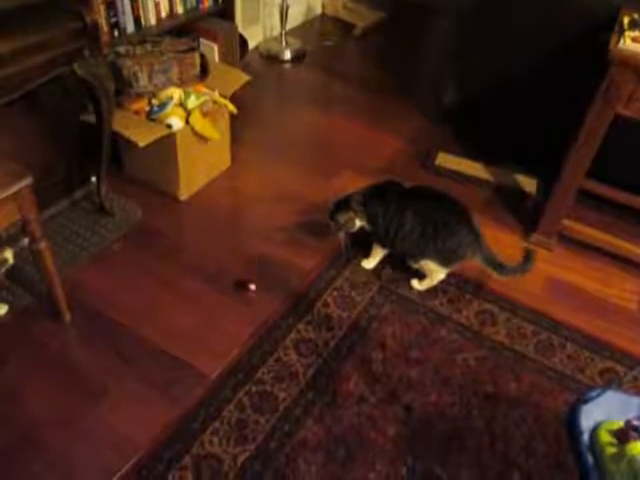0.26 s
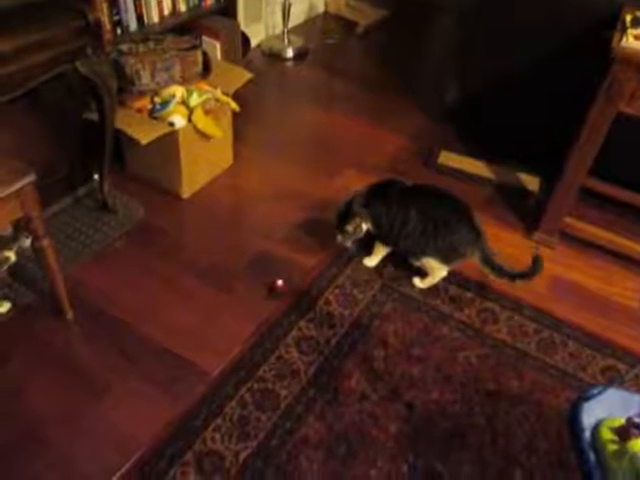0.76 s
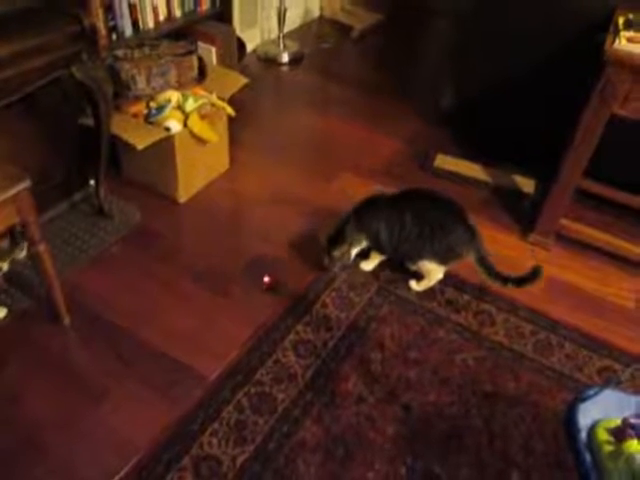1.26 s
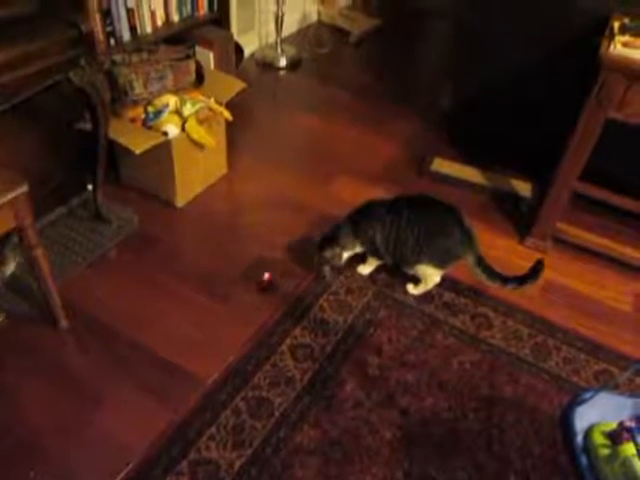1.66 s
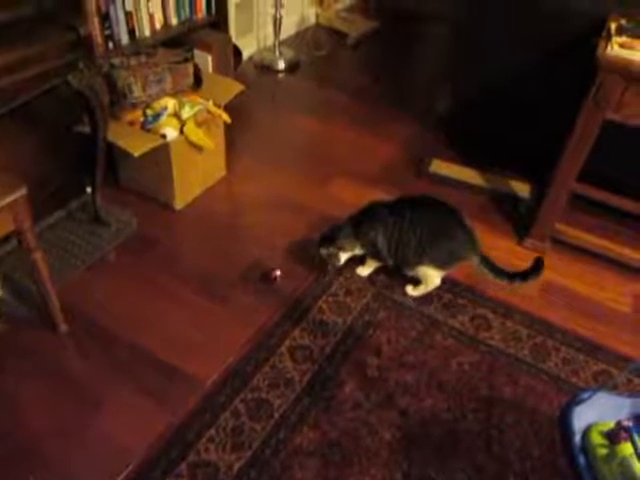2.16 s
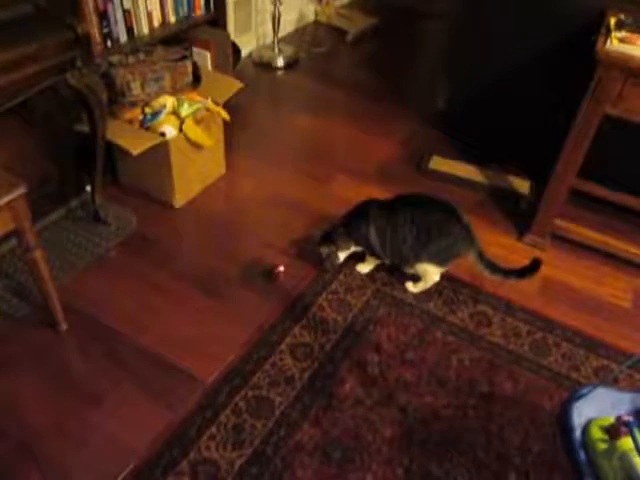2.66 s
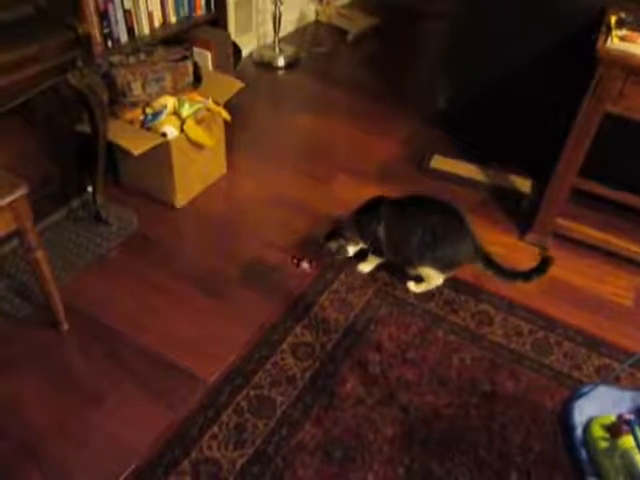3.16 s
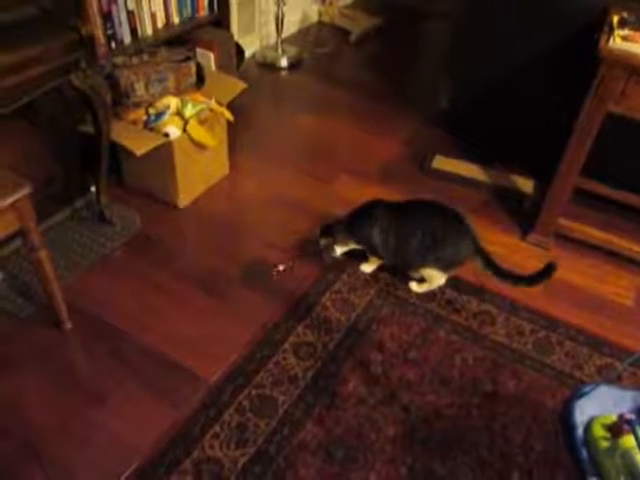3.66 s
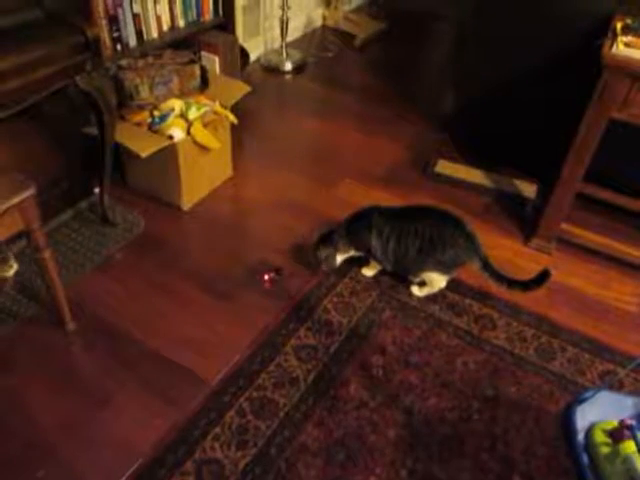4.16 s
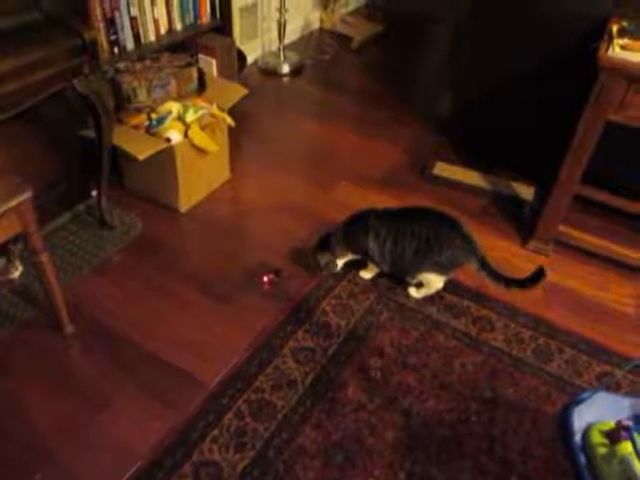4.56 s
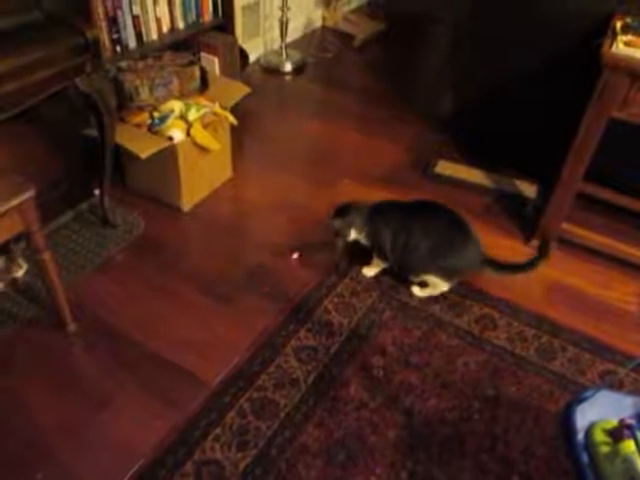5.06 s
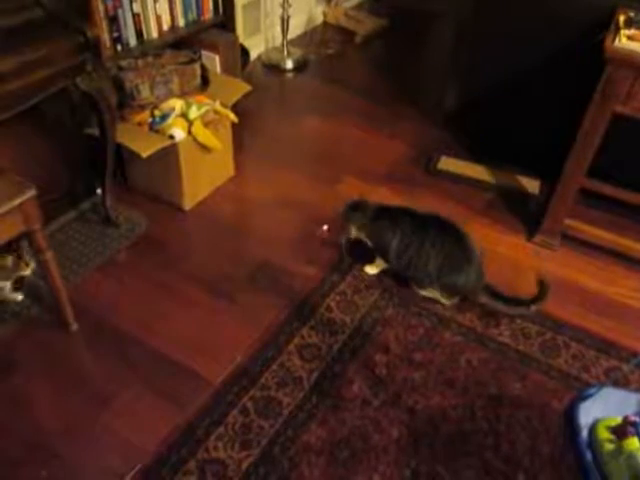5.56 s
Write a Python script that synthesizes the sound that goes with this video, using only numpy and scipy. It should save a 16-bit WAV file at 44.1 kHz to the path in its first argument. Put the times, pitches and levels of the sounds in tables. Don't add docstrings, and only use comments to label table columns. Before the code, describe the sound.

In a quiet furnished room, a tiny motorised toy rattles over floorboards a few steps from a small camera microphone. It runs, stops, runs again with limping gears, pauses for clicks, then makes two more whirring runs over soft hiss.

```python
import sys
import numpy as np
from scipy import signal
from scipy.fft import rfft, irfft
from scipy.io import wavfile
from scipy.ndimage import uniform_filter1d

SR = 44100
rng = np.random.default_rng(int(sys.argv[2]) if len(sys.argv) > 2 else 0)


def generate_wav(sig):
    pcm = np.round(np.clip(np.atleast_2d(sig).T, -1, 1) * 32767).astype(np.int16)
    wavfile.write(sys.argv[1], SR, pcm)


def decibels_to_gain(level_db):
    exponent = np.asarray(level_db, float) / 20
    return 10 ** exponent


N = 256200

# time in seconds, level in dB.
RUN_EFFORT = [
    [(0, -27.5), (.09, -31.5), (.25, -28), (.66, -32.5), (.98, -30), (1.056, -31), (1.13, -42.5),
     (1.22, -54)],
    [(1.452, -45), (1.47, -37), (1.552, -30), (1.62, -33), (1.94, -30.5), (2.0, -39.5), (2.034, -43),
     (2.1, -57)],
    [(2.58, -79), (2.62, -40.5), (2.65, -28.5), (2.93, -31.5), (3.5, -29), (3.89, -29), (3.956, -41),
     (4.06, -52.5)],
    [(4.5, -70), (4.52, -59), (4.538, -32), (4.6, -26.5), (4.76, -28.5), (5.54, -27), (5.65, -30.5),
     (5.81, -28)],
]
# time in seconds, pitch in Hz, level in dB.
MOTOR_WHINE = [
    [(0, 788, -43), (0.184, 789, -44), (0.424, 795, -48.5), (0.44, 789, -68)],
    [(0.45, 819, -41), (0.578, 820.4, -34.5), (0.744, 813.3, -38.5), (1.05, 819, -37.5),
     (1.1, 820.5, -53.5)],
    [(2.63, 795, -47.5), (2.96, 787.5, -48), (3.08, 783.5, -44.5), (3.194, 803, -43.5),
     (3.716, 794.4, -44.5), (3.956, 786, -52), (3.98, 830, -57)],
    [(4.57, 834, -42), (4.62, 831, -43), (4.7, 835, -45.5), (4.9, 823, -48.5), (5.04, 823, -41),
     (5.11, 824.5, -47), (5.438, 824, -42.5), (5.81, 822, -48.5)],
]
# time in seconds, pitch in Hz, level in dB.
TWIN_WHINE = [
    [(0.46, 868.7, -56), (0.692, 845.7, -48), (1.08, 865, -53)],
    [(4.53, 730, -56), (4.572, 731, -46), (4.668, 741, -48), (4.984, 734.7, -49), (5.5, 730, -49.5),
     (5.81, 730, -52)],
]
# frequency in Hz, level in dB per Hz.
SHELL_COLOUR = [(880, -37), (1500, -11.5), (1620, -12), (1720, -14), (2090, -14.5), (2350, -2),
                (2960, -1.5), (3200, -1), (3770, -2.5), (4230, -7), (4900, -8), (6040, -19.5),
                (8430, -30.5), (9540, -57), (12400, -66), (21000, -120)]
# frequency in Hz, width in Hz, level in dB.
SHELL_MODES = [(2420, 130, -3), (2890, 80, -5), (3260, 100, -2), (3830, 110, 0), (4430, 90, -6)]
# frequency in Hz, level in dB per Hz.
SCRAPE_COLOUR = [(450, -11), (600, -0.5), (950, 6.5), (1250, 6), (1600, -4.5), (2000, 6), (2400, -21.5)]
# frequency in Hz, width in Hz, level in dB.
BOARD_MODES = [(200, 60, -14), (350, 62, 0), (410, 70, -7), (496, 40, -11)]
# time in seconds, peak in dB, ring in Hz.
HARD_KNOCKS = [(0.052, -13.5, 3580), (0.1054, -26, 3050), (0.206, -10.5, 3470), (0.2898, -15, 2520),
               (0.3584, -14, 3810), (0.4129, -21, 2390), (0.4725, -13, 2540), (0.6598, -14.5, 2670),
               (0.71, -10, 2507), (0.7821, -19.5, 2500), (0.8323, -10.5, 2415), (1.0725, -14, 2667),
               (2.6498, -9, 3320), (2.721, -9.5, 3170), (2.8087, -10.5, 3630), (2.879, -11, 3800),
               (2.969, -16, 3670), (3.035, -10.5, 3460), (3.1495, -11, 2920), (3.2644, -9, 3023),
               (3.3413, -15, 2740), (3.5138, -9, 2324), (3.6475, -13.5, 2710), (4.6135, -21.5, 2902),
               (4.657, -21.5, 3330), (4.7408, -37, 3380), (5.1729, -11.5, 3100), (5.2354, -10.5, 3090),
               (5.2934, -20.5, 3227), (5.4856, -10, 2320)]
# time in seconds, blow in dB, rumble in dB.
BUMPS = [(0.21, -31, -44), (.488, -41, -55), (.584, -50, -39.5), (.978, -54, -40), (1.522, -6, -44),
         (1.554, -50, -42), (1.976, -53, -35), (2.695, -28, -33), (2.88, -37, -47), (3.186, -25, -35.5),
         (3.239, 0, -54), (3.496, -15, -55), (3.576, -9, -56), (3.755, -15, -62), (3.945, -41, -31),
         (3.979, -45, -36.5), (4.635, -43, -36), (4.8, -14, -31), (5.24, -34.5, -36), (5.272, -30, -34),
         (5.543, -41, -50), (5.736, -39, -33.5)]
# time in seconds, peak in dB, upper ring in Hz, lower rings in dB,
# bright rings in dB.
CLICKS = [
    (1.1375, -23.5, 2960, 3.5, -24),
    (1.3025, -23, 3720, -2, 14.5),
    (1.4117, -22, 3430, 3.5, -18),
    (1.996, -31, 3390, 9, -11),
    (2.0261, -25.5, 3540, -1.5, -15),
    (2.363, -20.5, 3920, -5.5, 11),
    (2.5456, -33.5, 3666, 5.5, -4),
    (2.556, -30, 3700, -9, -6),
]
# frequency in Hz, time to fall 60 dB in seconds.
LOWER_RINGS = [(1350, 0.0041), (2100, 0.0051), (2800, 0.0061)]
# frequency in Hz, level in dB per Hz.
HISS_COLOUR = [(12, -18.5), (20, -8), (27, -10.5), (89, -8.5), (189, -9), (285, -6.5), (558, -10.5),
               (704, -15.5), (761, -8.5), (822, -12), (1740, -14), (5410, -23.5), (5840, -26.5),
               (9540, -56), (12400, -92.5), (21000, -120)]
# frequency in Hz, rms level in dB.
HUM = [(775, -70), (1712, -74), (5706, -73), (6293, -77)]
# frequency in Hz, time to fall 60 dB in seconds.
ROOM_DECAY = [(300, 0.26), (1000, 0.38), (3000, 0.35), (6000, 0.18), (9000, 0.31)]
# time in seconds, peak in dB, pitch in Hz.
CREAKS = [(2.533, -38.5, 870), (2.549, -39, 1380), (2.562, -36, 1130), (2.576, -45, 1150),
          (2.59, -39, 1310), (2.602, -41, 1460)]
# frequency in Hz, time to fall 60 dB in seconds.
EDGE_RINGS = [(700, 0.013), (4450, 0.004), (5800, 0.0036), (7800, 0.0024)]
# start in seconds, once-a-turn beat in dB, then lone strikes,
# drumming and scrape in dB against effort.
GAITS = [
    (0, 4, -20.5, -17, -17.5),
    (1.3, 6, -17, -14, -17.5),
    (2.3, 2, -22, -16.5, -16.5),
    (4.3, 0, -23, -19.5, -18.5),
    (5.3, -4, -22.5, -22, -20.5),
]
# start in seconds, 2nd overtone in dB, 3rd overtone in dB,
# roughness from 0 to 1.
LOADS = [(0, -14, -10, .15), (.445, -19, -3, .05), (2, -14, -3, .45), (3.15, -12, -1, .35),
         (4.3, -12, -7, .4), (4.9, -4, -7, .22), (5.64, -14, -7, .25)]
# start of a round in seconds, level in dB.
LIMPS = [(1.467, -34), (1.5417, -17), (1.6199, -18), (1.6967, -17), (1.7739, -21), (1.8489, -21.5),
         (1.931, -23)]
# delay in seconds, level in dB, ring in Hz, treble in dB, low in dB.
LIMP_FIGURE = [
    (0, 3, 3260, -29, -9.5),
    (0.0317, -4, 3700, -29, -12.5),
    (0.052, -29.5, 2750, -19, -19),
]
CASE_DB = [4.5, 4.5, -0.5, 4.5, -15, -12, -21, -24]
# time in seconds, peak in dB, ring in Hz.
MORE_KNOCKS = [(0.6, -15.5, 3550), (0.7536, -22.5, 2620), (0.876, -22.5, 2450), (0.9512, -15, 3300),
               (1.6304, -16.5, 3720), (1.8354, -31, 2830), (2.6285, -26, 2550), (3.17, -18.5, 3003),
               (4.5338, -31, 2740), (2.9518, -14, 2970), (3.7662, -29, 3020), (3.8058, -20.5, 3320),
               (3.8725, -14, 2930), (3.9469, -20.5, 3620), (4.2353, -36, 3400), (4.3291, -34.5, 3588),
               (5.0372, -12.5, 2203), (5.0633, -29, 2600)]
# start in seconds, level in dB.
FLANK = [
    (0, -30),
    (4.3, -5),
]

TURN_S, TURN_HZ = 1.619, 39.1
THIN_FROM_HZ, THIN_DB, THIN_DB_PER_KHZ = 8200, -110, 9


def evened(x):
    return x / np.sqrt(np.mean(x ** 2) + 1e-20)


def read(points, hz):
    f, value = np.transpose(points)
    return np.interp(np.log(hz + 1), np.log(f + 1), value)


def played(tables, index, rest):
    t, out = np.arange(N) / SR, np.full(N, float(rest))
    for rows in tables:
        rows = np.array(rows)
        on = (t >= rows[0, 0]) & (t <= rows[-1, 0] + .02)
        out[on] = np.interp(t[on], rows[:, 0], rows[:, index])
    return out


def level(tables, index):
    return uniform_filter1d(decibels_to_gain(played(tables, index, -120)), size=200)


def stepped(rows, index):
    rows = np.array(rows)
    return rows[np.searchsorted(rows[1:, 0], np.arange(N) / SR), index]


def coloured(x, points):
    hz = abs(np.fft.fftfreq(8192, 1 / SR))
    log_gain = np.log(decibels_to_gain(np.maximum(read(points, hz), -100)))
    taps = np.fft.ifft(np.exp(np.conj(signal.hilbert(log_gain)))).real[:2048]
    return signal.oaconvolve(x, taps / np.linalg.norm(taps))[:N]


def ring(x, hz, width):
    r = np.exp(-np.pi * width / SR)
    return 2 * signal.lfilter([1 - r], [1, -r * np.exp(2j * np.pi * hz / SR)], x).real


def ticks(per_s, spread_db):
    when, size, sign = rng.random(N), rng.exponential(1, N), rng.choice([-1., 1.], N)
    return evened((when < per_s / SR) * sign * decibels_to_gain(spread_db * np.minimum(size, 3.2)))


def drift(hz):
    slowness = 1 + (np.fft.rfftfreq(N, 1 / SR) / hz) ** 2
    return evened(irfft(rfft(rng.standard_normal(N)) / slowness, N))


def train(events):
    out = np.zeros(N)
    for s, db in events:
        out[min(round(s * SR), N - 1)] = decibels_to_gain(db)
    return out


def add(mix, s, sound):
    part = mix[round(s * SR):][:len(sound)]
    part += sound[:len(part)]


def wheel_turn():
    return (np.arange(N) / SR - TURN_S) * TURN_HZ % 1


def gears():
    spot = rng.integers(0, len(SHELL_MODES), N)
    effort = level(RUN_EFFORT, 1)
    beat = .5 - wheel_turn()
    throb = decibels_to_gain(1.52 * drift(45) + 0.21 * drift(260) + stepped(GAITS, index=1) * beat)
    chatter = effort * evened(shell(ticks(1700, spread_db=-1.5) * throb, spot))
    chatter += decibels_to_gain(stepped(FLANK, index=1)) * ring(chatter, 2200, 200)
    sparks = ring(ring(ticks(92, spread_db=3.5) * throb, 5600, 1700), 5600, 1700)
    chatter += decibels_to_gain(stepped(GAITS, index=2)) * effort * evened(sparks)
    return decibels_to_gain(-2.5) * chatter + decibels_to_gain(-20.0) * gear_knocks(spot)


def gear_knocks(spot):
    t = np.arange(N) / SR
    s, db, hz, treble_db, low_db = knock_rows()
    dying, rattle = decibels_to_gain(-60 * t[:2500] / 0.098), ticks(2500, spread_db=2.5)

    def burst(burst_db):
        blows = train(zip(s, burst_db))
        return rattle * signal.oaconvolve(blows, dying)[:N] + 3.0 * blows

    knocks = shell(burst(db), spot)
    knocks += decibels_to_gain(-15) * ring(ring(burst(db + treble_db), 6000, 2400), 6000, 2400)
    knocks += decibels_to_gain(21) * ring(ring(burst(db + low_db), 1000, 700), 1000, 700)
    for at, peak_db, f in zip(s, db, hz):
        fading = decibels_to_gain(peak_db + 8 - 60 * t[:900] / .025)
        add(knocks, at, fading * np.sin(2 * np.pi * f * t[:900]))
    return knocks


def knock_rows():
    straight = [(s, db, hz, -15, -20.5) for s, db, hz in HARD_KNOCKS + MORE_KNOCKS]
    limping = []
    for s, db in LIMPS:
        for late, step_db, *colour in LIMP_FIGURE:
            limping.append((s + late, db + step_db, *colour))
    return np.transpose(straight + limping)


def shell(x, spot):
    modes = 0
    for k, (hz, width, db) in enumerate(SHELL_MODES):
        modes = modes + decibels_to_gain(db + 3 * drift(5)) * ring(x * (spot == k), hz, width)
    return coloured(x + decibels_to_gain(6.5) * modes, SHELL_COLOUR)


def boards(x):
    return sum(decibels_to_gain(db) * ring(ring(x, hz, width), hz, 1.62 * width) for hz, width, db in BOARD_MODES)


def wheels():
    effort = level(RUN_EFFORT, 1)
    grit = ticks(1200, spread_db=0.5) * decibels_to_gain(3.2 * drift(40) - 10.5 * wheel_turn())
    scuffs = ticks(900, spread_db=1.5) * decibels_to_gain(2.0 * drift(40) - 4 * wheel_turn())
    scrape = coloured(scuffs, SCRAPE_COLOUR)
    s, blow_db, rumble_db = np.transpose(BUMPS)
    swell = np.bartlett(round(0.038 * SR))
    rumble = signal.oaconvolve(train(zip(s, rumble_db)), swell, "same")
    rolling = decibels_to_gain(stepped(GAITS, index=3)) * effort + rumble
    dragging = decibels_to_gain(stepped(GAITS, index=4)) * effort
    drumming = decibels_to_gain(-3.5) * rolling * evened(boards(grit))
    blows = decibels_to_gain(21.0) * boards(train(zip(s, blow_db)))
    return drumming + blows + dragging * evened(scrape)


def motor(tables, rough, overtones_db):
    turn = 2 * np.pi * np.cumsum(played(tables, 1, 800) + 1.5 * drift(8)) / SR
    out = np.zeros(N)
    for k, db in enumerate(overtones_db, 1):
        scatter = drift(29) * np.sin(k * turn) + drift(24) * np.cos(k * turn)
        fuzz = np.clip(rough + 0.087 * (k - 1), 0, 1)
        steady = np.sqrt(2 - 2 * fuzz) * np.sin(k * turn + k)
        out += decibels_to_gain(db) * (steady + np.sqrt(fuzz) * scatter)
    return level(tables, 2) * out


def controller():
    out, t = np.zeros(N), np.arange(700) / SR
    chance = rng.random((len(CLICKS), 8))
    for (s, db, hz, low_db, bright_db), phase in zip(CLICKS, chance):
        levels = db + np.add(CASE_DB, [low_db] * 3 + [0, 0] + [bright_db] * 3)
        rings = LOWER_RINGS + [(hz, .0065)] + EDGE_RINGS
        snap = np.zeros(700)
        for (f, t60), ring_db, p in zip(rings, levels, phase):
            snap += decibels_to_gain(ring_db - 60 * t / t60) * np.sin(2 * np.pi * f * (t + p / 4000))
        snap = snap * (1 - np.exp(-t / 0.00037))
        add(out, s, snap)
        add(out, s + 0.001472, decibels_to_gain(-8) * snap)
    for s, db, hz in CREAKS:
        add(out, s, decibels_to_gain(db + 1.0) * np.sin(2 * np.pi * hz * t[:200]) * np.hanning(200))
    return out


def room(x):
    taps, at = np.zeros(SR // 2), np.arange(260, SR // 2 - 20, 20)
    taps[at + rng.integers(0, 20, at.shape)] = rng.choice([-1., 1.], at.shape)
    hz, t, z = signal.stft(taps, SR, nperseg=256)
    fading = decibels_to_gain(-60 * t / read(ROOM_DECAY, hz)[:, None])
    tail = signal.istft(z * fading, SR, nperseg=256)[1]
    return signal.fftconvolve(x, tail / np.linalg.norm(tail))[:N]


def hiss():
    hz, t = np.fft.rfftfreq(N, 1 / SR), np.arange(N) / SR
    air = evened(irfft(rfft(rng.standard_normal(N)) * decibels_to_gain(read(HISS_COLOUR, hz)), N))
    lines = sum(np.sqrt(2) * decibels_to_gain(db + 2.1 * drift(3.2)) * np.sin(2 * np.pi * f * t) for f, db in HUM)
    return decibels_to_gain(-49.5) * air + lines


def scene():
    rough = np.clip(stepped(LOADS, index=3), 0, 1)
    whine = motor(MOTOR_WHINE, rough, [0, stepped(LOADS, index=1), stepped(LOADS, index=2)])
    whine = whine + motor(TWIN_WHINE, 0.26, [0])
    toy, hand = gears() + wheels(), controller()
    echoes = room(decibels_to_gain(-7.0) * toy + decibels_to_gain(-18) * whine + decibels_to_gain(-10.0) * hand)
    return (toy + whine + hand + echoes + hiss())[None]


def thinned(x):
    hz, t, z = signal.stft(x, SR, window="cosine", nperseg=2048)
    band = np.arange(len(hz)) // 5
    power = np.add.reduceat(abs(z) ** 2, np.arange(0, len(hz), 5))[band] / 5
    limit_db = THIN_DB + THIN_DB_PER_KHZ * (band * 5 * hz[1] - THIN_FROM_HZ) / 1000
    limit = decibels_to_gain(2 * limit_db)
    keep = (power > limit[:, None]) | (hz < THIN_FROM_HZ)[:, None]
    return signal.istft(z * keep, SR, window="cosine", nperseg=2048)[1][:N]


def roll_off(x):
    return signal.sosfilt(signal.butter(12, 9690, fs=SR, output="sos"), x)


def record(dry):
    edge = signal.firwin(127, 9400, window=("kaiser", 7), fs=SR)
    heard = thinned(signal.oaconvolve(dry[0], edge, "same"))
    mix = heard[None] - .0022
    return roll_off(mix)


dry = scene()
out = record(dry)
generate_wav(out)
```